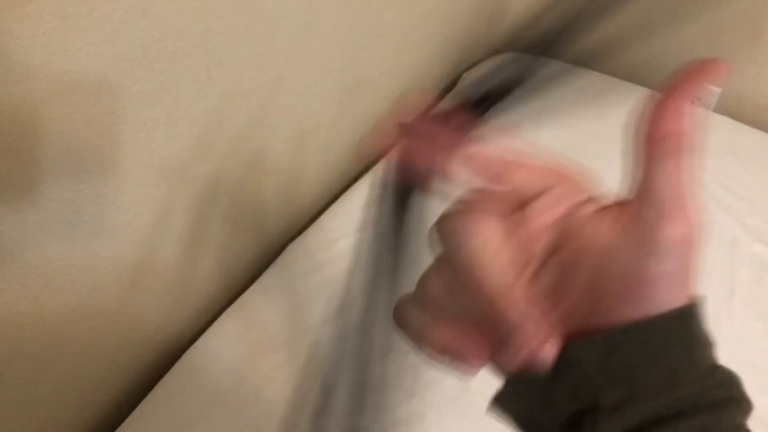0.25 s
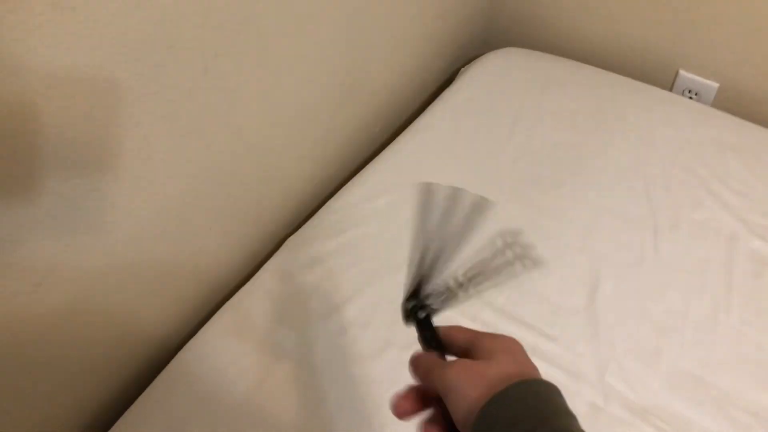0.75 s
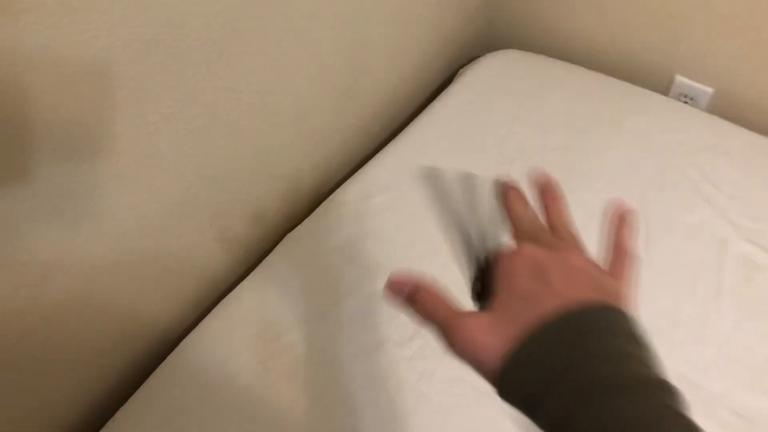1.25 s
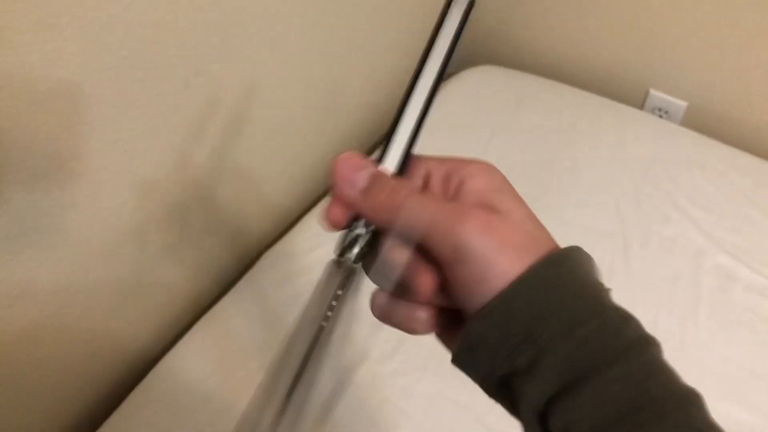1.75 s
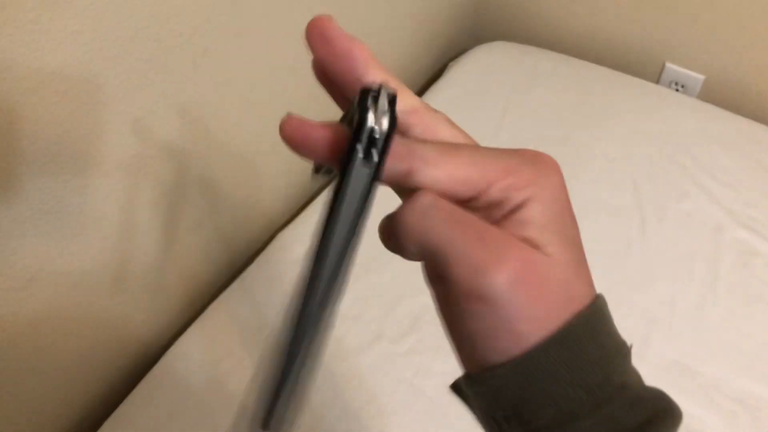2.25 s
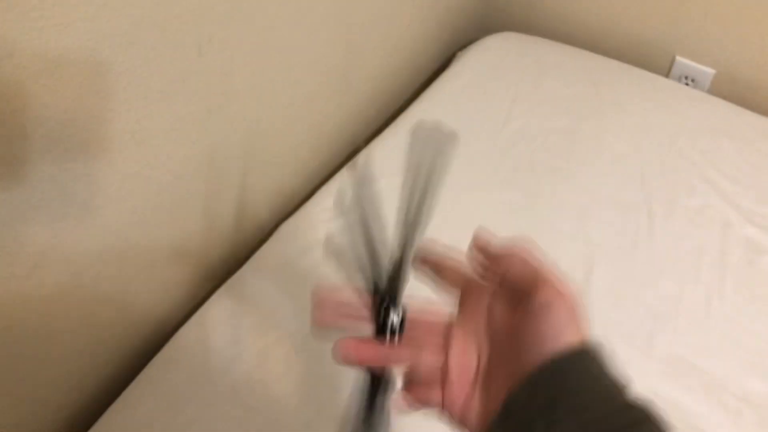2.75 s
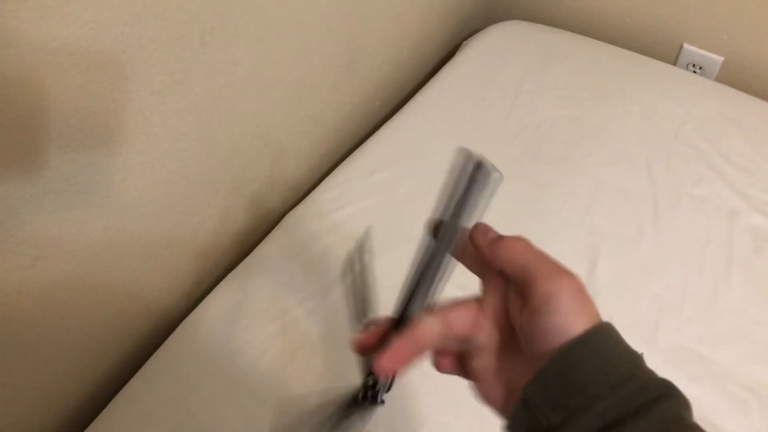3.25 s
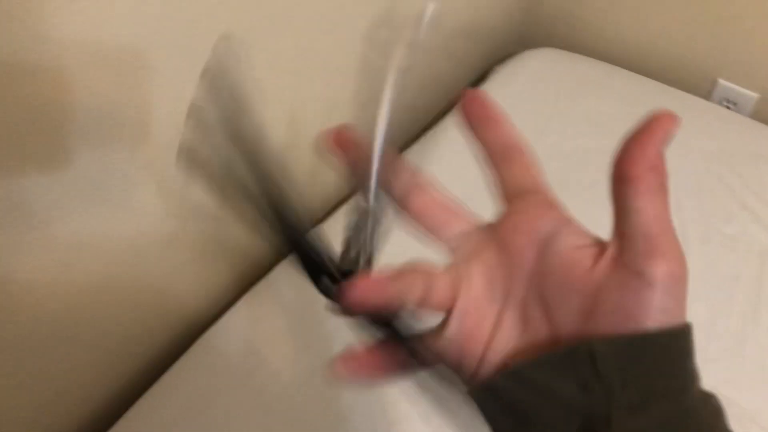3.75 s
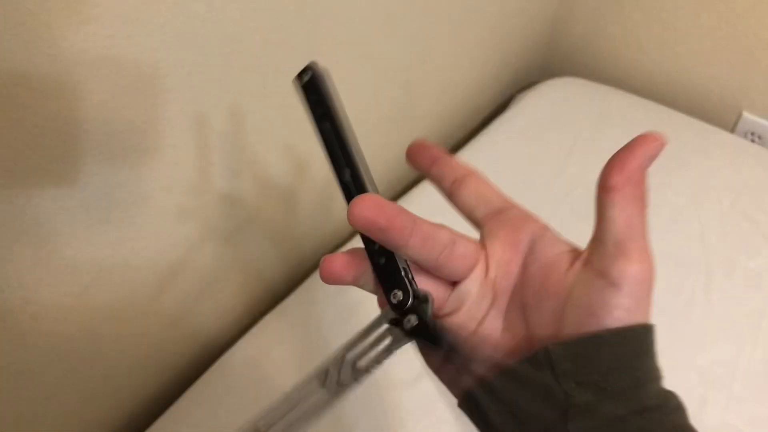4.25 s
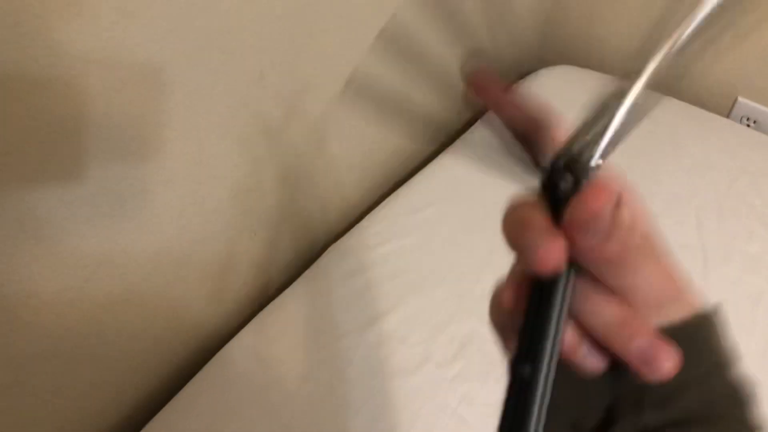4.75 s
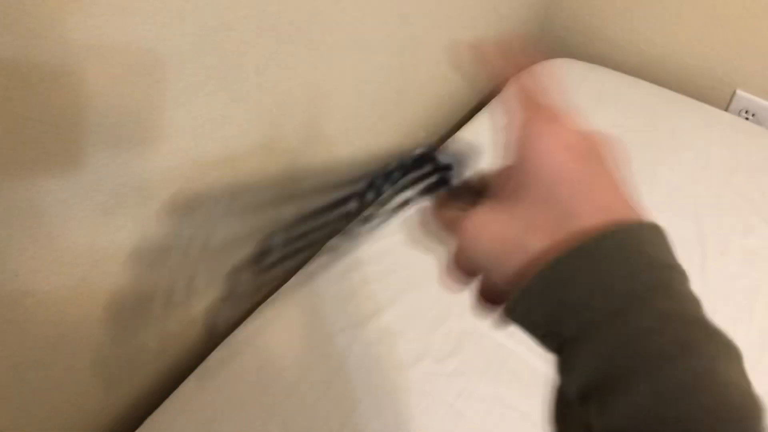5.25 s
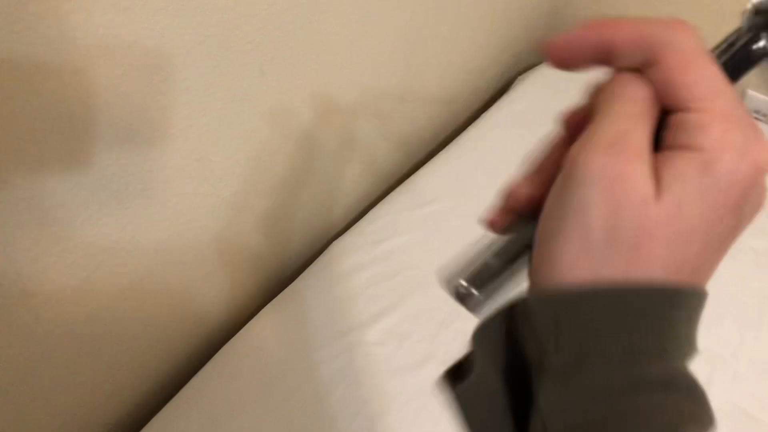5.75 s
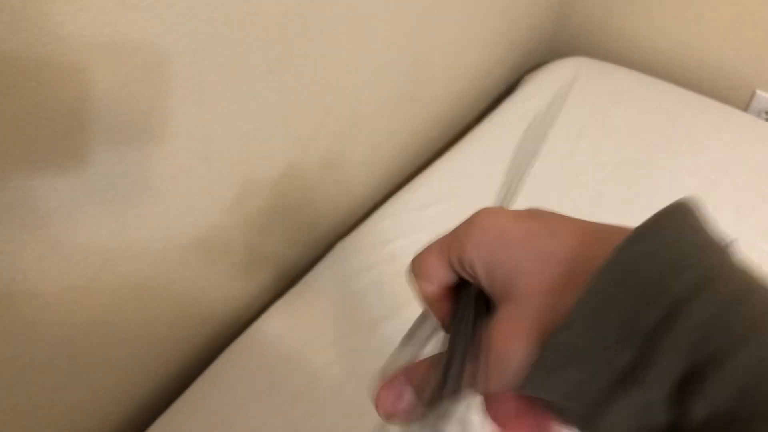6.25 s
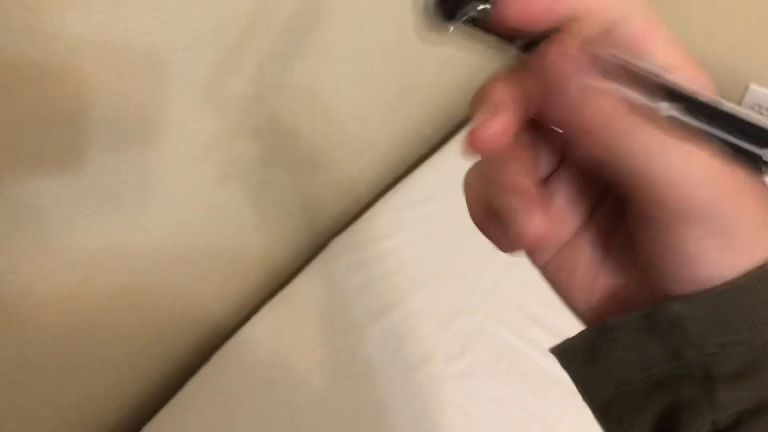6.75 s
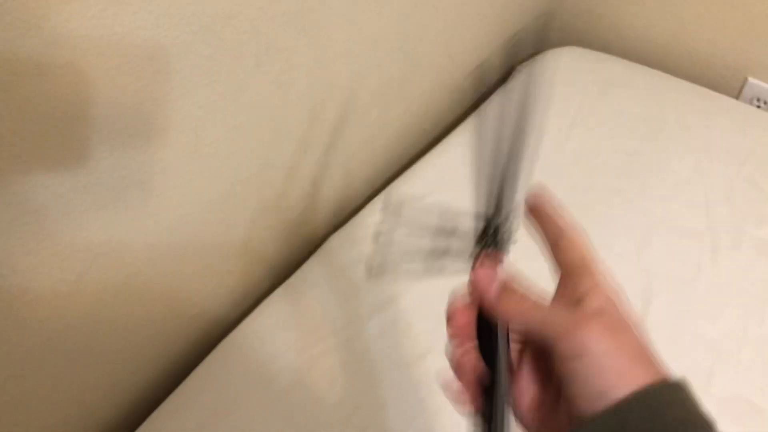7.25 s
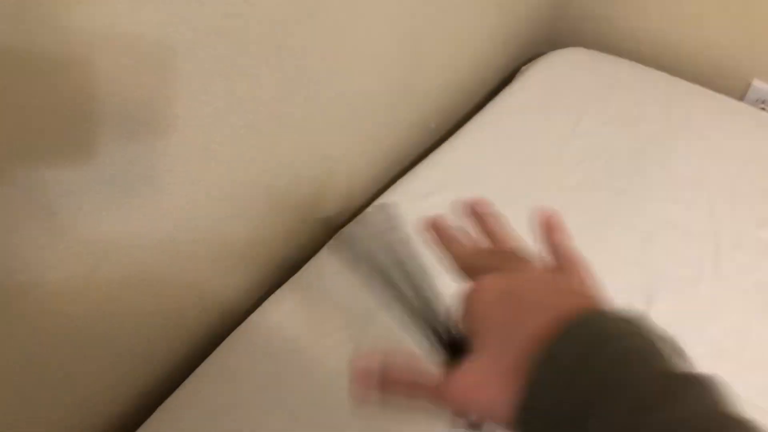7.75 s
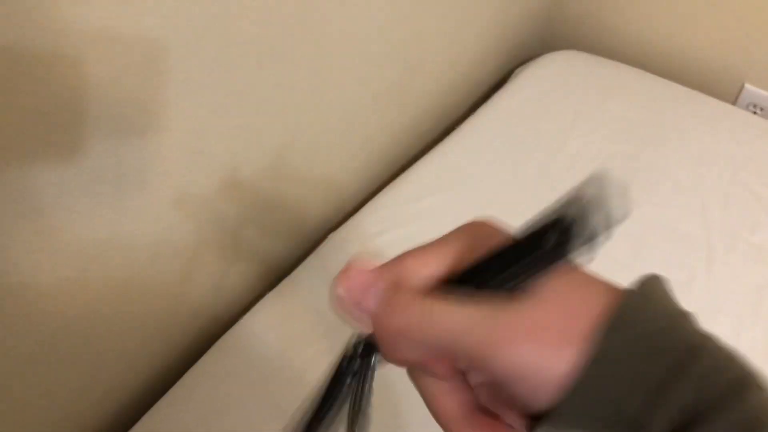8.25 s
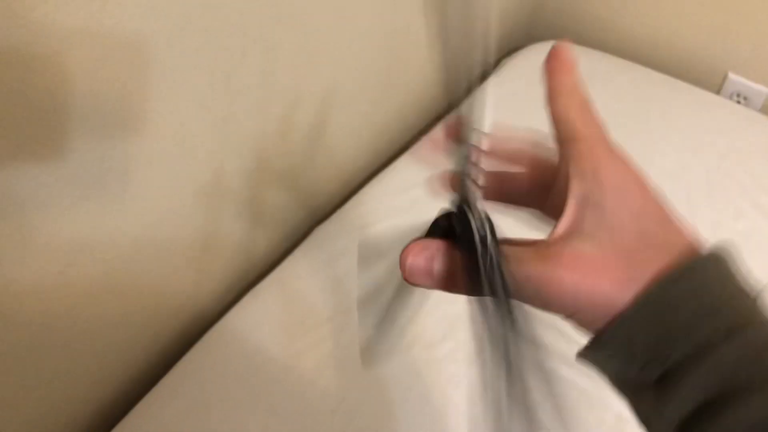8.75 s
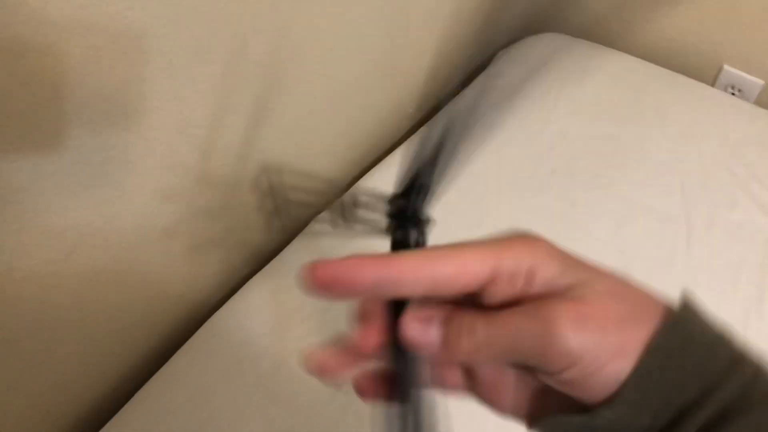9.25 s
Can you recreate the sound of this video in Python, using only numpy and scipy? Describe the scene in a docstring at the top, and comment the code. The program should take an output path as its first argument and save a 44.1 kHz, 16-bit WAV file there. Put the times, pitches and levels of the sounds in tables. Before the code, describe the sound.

Metal handles slap together and against a blade at uneven intervals, starting softly, then hitting hard around two seconds and again between six and seven. Some strikes stutter into several quick rebounds. Between them are delicate clicks, faint rubbing, muffled knocks and two barely audible thin squeaks. The phone is close, the bedroom briefly echoes, and low air noise stays underneath.

```python
"""Butterfly knife flipped in a small bedroom

A butterfly knife is flipped by hand close to a phone. Its handles slap against each other and the blade, chatter
for a few milliseconds and bounce: noisy blows ring metal modes. The loose pivots tick lightly and squeak twice.
Between the clacks, coloured noise makes skin and sleeve rub, the knife bumps dully into the fingers,
and a low swish comes and goes over steady air. The walls echo all but the rubbing, swish and air."""
import sys
import numpy as np
from scipy import signal
from scipy.fft import rfft, irfft, next_fast_len
from scipy.io import wavfile
from scipy.ndimage import map_coordinates

SR = 44100
rng = np.random.default_rng(int(sys.argv[2]) if len(sys.argv) > 2 else 0)


def transcribe(signal):
    """Save signal, clipped to [-1, 1], as a 16-bit WAV file at the path in sys.argv[1]."""
    frames = np.atleast_2d(signal).T
    limited = np.clip(frames, -1, 1)
    pcm = np.round(limited * 32767).astype(np.int16)
    wavfile.write(sys.argv[1], SR, pcm)


N = 419832
HIT_SIZE = 4096  # length of one hit, in samples
STRIKE_SPREAD_DB = 2  # random spread of each mode's level from hit to hit

# Modes of the hand-damped knife, from hollow to bright.
# Each row: frequency in Hz, bandwidth in Hz, level in dB relative to the other modes of its group.
CLACK = [(2176, 260, -7), (2624, 390, -4), (2900, 260, -4.5), (3680, 300, 0.5)]
RING = [(4400, 990, -12.5), (4880, 650, -9.5), (5660, 380, -8.5), (6350, 580, -8), (7182, 240, 3),
        (7730, 260, -4), (8270, 790, -14)]
SHEEN = [(9930, 3300, -13), (11280, 290, -6), (11560, 990, -2.5), (13950, 1300, -2.5), (15110, 580, -1.5)]


def amp(db):
    """Decibels to gain."""
    return 10 ** (np.asarray(db) / 20)


def along(points, hz):
    """Read (Hz, value) points on a log frequency axis."""
    f, v = np.transpose(points)
    return np.interp(np.log(hz + 1), np.log(f + 1), v)


def wobble(rate):
    """A smooth random curve with rate knots a second."""
    knots = rng.standard_normal(int(N * rate / SR) + 4)
    return map_coordinates(knots, [np.arange(N) * rate / SR])


def filtered(x, response):
    """x times a response of frequency."""
    size = next_fast_len(len(x) + HIT_SIZE)
    hz = np.fft.rfftfreq(size, 1 / SR)
    return irfft(rfft(x, size) * response(hz), size)[:len(x)]


def coloured(x, spectrum):
    """x with a (Hz, dB) colour, at rms 1."""
    sound = filtered(x, lambda hz: amp(along(spectrum, hz)))
    return sound / np.std(sound)


def add(track, s, sound):
    """Mix a sound into the track at time s."""
    part = track[max(round(s * SR), 0):][:len(sound)]
    part += sound[:len(part)]


def swells(rows):
    """Summed power of bell-shaped (middle s, peak dB, half length s) swells."""
    t, power = np.arange(N) / SR, np.zeros(N)
    for s, db, half_length in rows:
        near = slice(*np.searchsorted(t, [s - 4 * half_length, s + 4 * half_length]))
        power[near] += amp(db) ** 2 * np.exp(-((t[near] - s) / half_length) ** 2)
    return power


def resonate(force, modes, detune):
    """Ring the modes at fresh strengths, as each blow lands on another spot; energy of rms 1 over 5 ms."""
    chance = rng.standard_normal((len(modes), 2))
    tuned = [(hz * (1 + detune * a), width, amp(db + STRIKE_SPREAD_DB * b))
             for (hz, width, db), (a, b) in zip(modes, chance)]

    def response(f):
        # neighbouring modes alternate in sign
        return sum((-1) ** k * gain * 1j * f * width / (hz * hz - f * f + 1j * f * width)
                   for k, (hz, width, gain) in enumerate(tuned))

    ring = filtered(force, response)
    return ring / np.linalg.norm(ring) * np.sqrt(.005 * SR)


def contact(chatter, grit, grit_t60):
    """Force of one blow: a strike, a noisy buzz of tiny rebounds in the pivot's play, then a dying grating."""
    t = np.arange(HIT_SIZE) / SR
    fall = amp(-60 * np.maximum(t - chatter, 0) / grit_t60)
    force = grit * rng.standard_normal(HIT_SIZE) * fall
    force[0] += 1
    return force


def blows():
    """Slaps and rebounds, the soft ones hollower: the sound towards the phone and that towards the walls."""
    # A swinging handle slaps home; the grip sets pitch and strength of the two bending modes.
    # Each row: start in seconds, ring level in dB, thud in dB re ring, sheen in dB re ring,
    # level towards the walls in dB re direct, low bend in Hz, its dB re clack, high bend in Hz, its dB re clack.
    slap_rows = [(0.2663, -29, -13, -13, -1.5, 1633, -3, 2490, -7.5),
                 (0.6256, -22, -19.5, -16.5, 2.5, 1650, -15.5, 2520, -7),
                 (.897, -21, -27.5, -15, 6, 1670, -13.5, 2450, -1.5),
                 (1.482, -22, -16, -4, 1.5, 1640, -7, 2400, 1),
                 (1.7932, -11.5, -34, -9.5, 3, 1680, -13.5, 2420, -3),
                 (2.266, -10.5, -19, -7.5, 0, 1630, -7, 2630, 1),
                 (2.8208, -15, -27.5, -12, 4, 1640, -12.5, 2540, -14),
                 (3.344, -27.5, -16, -11, 3.5, 1713, -13, 2700, -5),
                 (4.0649, -25.5, -17.5, -3.5, -1, 1740, -10, 2560, 2.5),
                 (4.0787, -23, -17.5, -9, 3, 1665, -8, 2560, -1),
                 (4.961, -27.5, -15.5, -10, 0.5, 1660, -7.5, 2550, 0.5),
                 (5.3234, -41, -9.5, -3, 4, 1500, -6, 2000, -12),
                 (5.5392, -38.5, -6.5, -13, 0, 1700, -1, 2580, 2.5),
                 (5.9286, -25, -13, -8, 0, 1610, -4.5, 2430, -9.5),
                 (6.3017, -13.5, -40, -7, -1.5, 1686, -9, 2555, 2.5),
                 (6.7814, -31.5, -23, -8, 1.5, 1554, -4, 2240, -11.5),
                 (7.0026, -8.5, -41, -15, -1.5, 1530, -11, 2885, -13.5),
                 (7.1534, -20, -33.5, -12.5, 0, 1660, -9, 2280, -14),
                 (7.8599, -34, -28.5, -13, 3.5, 1660, -14.5, 2820, -13),
                 (8.6407, -28, -45, -11, 2, 1540, -3.5, 2885, -9),
                 (9.1109, -24.5, -19, -11.5, 0, 1725, -17, 2200, -5),
                 (9.365, -23, -25, -8.5, 1.5, 1570, -3, 2280, -3),
                 (9.5165, -16, -48, -13.5, -4, 1470, -5.5, 2950, -4)]
    # The handle bounces and lands again, still in the grip of the slap before.
    # Each row: start in seconds, ring level in dB.
    rebound_rows = [(0.91, -29), (1.535, -45), (2.2818, -17.5), (2.3079, -28), (2.3268, -23), (2.338, -31),
                    (2.8376, -17), (2.8496, -33.5), (4.0908, -34), (5.9476, -24.5), (5.958, -28),
                    (5.9672, -34), (5.9786, -34.5), (6.327, -14), (6.3429, -14), (6.3536, -32.5),
                    (7.1957, -38.5), (7.877, -27), (7.891, -26), (7.8998, -30)]
    medium_clack_db, medium_blow_db = -9.5, -25.5  # clack re ring, in a blow of medium strength
    clack_fall = .42  # dB less clack for each dB more strength: hard blows are brighter
    chatter_s, chatter_spread = 0.0023, 0.33  # typical buzz, and its log spread from blow to blow

    direct, outward = np.zeros((2, N))
    starts = [row[0] for row in slap_rows]
    rebounds = [(s, db, *slap_rows[np.searchsorted(starts, s) - 1][2:]) for s, db in rebound_rows]
    for s, db, thud_db, sheen_db, wall_db, *bends in list(slap_rows) + rebounds:
        clack_db = medium_clack_db - clack_fall * (db - medium_blow_db)
        colour = thud_db, clack_db, sheen_db, bends
        chatter = chatter_s * np.exp(chatter_spread * rng.standard_normal())
        force = contact(chatter, grit=0.57, grit_t60=0.016)
        add(direct, s, amp(db) * slap(force, *colour))
        # summed over all directions, the ripples of the chatter even out
        smooth_force = contact(chatter, grit=.04, grit_t60=.016)
        add(outward, s, amp(db + wall_db) * slap(smooth_force, *colour))
    return direct, outward


def slap(force, thud_db, clack_db, sheen_db, bends):
    """A bright ring near 7 kHz and a metallic sheen over a hollow clack."""
    ring = resonate(force, RING, detune=0.015)
    sheen = amp(sheen_db) * resonate(force, SHEEN, detune=0.017)
    return ring + sheen + knock(force, thud_db, clack_db, bends)


def knock(force, thud_db, clack_db, bends):
    """The handles' bending modes, shifted by the grip, and just after them the dull push into the hand."""
    # The hand that takes the blow. Each row: frequency in Hz, bandwidth in Hz, relative level in dB.
    hand_modes = [(170, 170, -6.5), (390, 200, -1), (720, 210, -8.5)]
    low_hz, low_db, high_hz, high_db = bends
    bend = amp(low_db) * resonate(force, [(low_hz, 110, 0)], detune=0.0066)
    bend += amp(high_db) * resonate(force, [(high_hz, 170, 0)], detune=0.0089)
    overtones = resonate(force, CLACK, detune=.025)
    clack = amp(clack_db) * (bend + amp(-2.0) * overtones)
    push = contact(0.00086, grit=0.079, grit_t60=0.01)
    add(clack, .001, amp(thud_db) * resonate(push, hand_modes, detune=0.063))
    return clack


def ticks():
    """Light, crisp touches in the pivots: thinner, with less ring."""
    # Light ticks of the pivots. Each row: start in seconds, level in dB.
    tick_rows = [(.4395, -58.5), (.4567, -59), (.5142, -59), (.5512, -52.5), (.5751, -54.5), (2.1252, -51),
                 (3.5898, -53), (3.6155, -53.5), (3.6491, -57), (3.8813, -51), (4.3932, -55), (5.1189, -46),
                 (5.1431, -51.5), (5.447, -61.5), (5.4745, -56), (5.493, -61), (5.5118, -55), (6.183, -60),
                 (6.2129, -60.5), (6.7086, -53), (7.3282, -49), (8.2618, -50.5), (8.3014, -46.5),
                 (8.3123, -50.5), (8.34, -58), (8.428, -59), (8.833, -58), (8.8813, -54), (8.93, -62)]
    # Bending modes in a loose grip: low bend in Hz, its dB re clack, high bend in Hz, its dB re clack.
    loose_bends = (1609.5, -5, 2221.5, -11.5)
    thud_db, clack_db = -11.5, -2.5  # re the tick
    track = np.zeros(N)
    for s, db in tick_rows:
        force = contact(.001, grit=.12, grit_t60=.018)
        tick = amp(-1) * resonate(force, RING, detune=.02)
        tick += amp(-3.5) * resonate(force, SHEEN, detune=0.057)
        add(track, s, amp(db) * (tick + knock(force, thud_db, clack_db, loose_bends)))
    return track


def squeaks():
    """A dry pivot sticks and slips as it turns, heard as a thin, wavering whistle."""
    # Squeaks of the pivot. Each row: middle in seconds, peak level in dB, mean pitch in Hz,
    # half length in seconds.
    squeak_rows = [(4.792, -68, 5760, 0.019), (5.798, -61.5, 6500, 0.014)]
    track = np.zeros(N)
    t = np.arange(-HIT_SIZE, HIT_SIZE) / SR
    for s, db, hz, half_length in squeak_rows:
        waver = 1 + 0.0056 * wobble(203)[:len(t)]
        tone = np.sqrt(2) * np.sin(2 * np.pi * np.cumsum(hz * waver) / SR)
        swell = np.exp(-(t / half_length) ** 2 / 2)
        add(track, s + t[0], amp(db) * swell * tone)
    return track


def bumps():
    """Flesh damps a contact to one dull, broad knock."""
    # Soft bumps of knife and hand. Each row: start in seconds, level in dB, pitch in Hz before a slight detune.
    bump_rows = [(.974, -49.5, 750), (2.607, -54.5, 760), (3.615, -50, 630), (4.672, -54.5, 657),
                 (5.12, -43, 295), (5.377, -49.5, 107.6), (5.409, -58, 80), (5.486, -48.5, 128),
                 (7.344, -56, 120), (7.483, -53.5, 716), (7.784, -57, 119.3)]
    track = np.zeros(N)
    for s, db, hz in bump_rows:
        force = contact(0.0015, grit=0.123, grit_t60=0.023)
        push = filtered(force, lambda f: 1 / (1 + 1j * f / (2 * hz)))  # gentle low-pass
        add(track, s, amp(db) * resonate(push, [(hz, hz, 0)], detune=0.017))
    return track


def rubbing():
    """Skin and sleeve slide over the metal in strokes of clumped grains, with noise stirring the knife's modes."""
    # Strokes along the handles, ahead of the mix of grains and metal.
    # Each row: middle in seconds, peak level in dB, half length in seconds.
    stroke_rows = [(.58, -56.5, 0.029), (.76, -63, 0.042), (1.25, -69.5, 0.085), (1.425, -53, 0.021),
                   (2.14, -61, 0.036), (3.62, -66, 0.028), (4.395, -58.5, .014), (4.861, -59, .008),
                   (5.13, -66.5, 0.11), (5.36, -60.5, 0.046), (5.49, -59.5, .04), (5.65, -59, .045),
                   (5.765, -60, 0.05), (6.50, -56, 0.054), (6.75, -62.5, 0.051), (7.39, -62.5, 0.032),
                   (7.62, -66.5, 0.023), (7.97, -55.5, 0.019), (8.10, -57, 0.043), (8.36, -60, 0.047),
                   (8.59, -62.5, .015), (8.86, -70, 0.042), (9.25, -66.5, 0.033)]
    # Colour of the grains. Each row: frequency in Hz, relative level in dB per Hz.
    grain_colour = [(350, -40), (600, -10), (1280, -9.5), (1590, -4), (3430, -10.5), (3730, -4.5),
                    (6640, -0.5), (7620, -5), (15100, -5.5), (16000, -10.5)]
    # faint rubbing of the restless fingers: middle level and wander in dB, shifts per second
    grip_db, grip_wander_db, grip_shifts = -76.5, 2, 3.4
    grip = amp(grip_db + grip_wander_db * wobble(grip_shifts))
    power = grip ** 2 + swells(stroke_rows)
    grains = rng.standard_normal(N) * amp(3.2 * wobble(900) + 2.0 * wobble(84))
    catches = rng.standard_normal(N) * amp(7 * wobble(150))
    metal = resonate(catches, CLACK + RING, detune=.005)
    texture = amp(1.0) * coloured(grains, grain_colour) + amp(-7.5) * metal / np.std(metal)
    return np.sqrt(power) * texture


def low_swish():
    """Low coloured noise that comes and goes in bell-shaped swells."""
    # Low swishes. Each row: middle in seconds, peak level in dB, half length in seconds.
    swish_rows = [(.38, -63.5, 0.18), (.75, -64.5, .12), (1.27, -56.5, 0.067), (2.6, -63, 0.16),
                  (4.75, -64.5, 0.33), (5.25, -64.5, 0.1), (6.55, -66, .25), (7.35, -61, .1),
                  (8.62, -64, .25), (9.48, -71, 0.14)]
    # Colour of the swish. Each row: frequency in Hz, relative level in dB per Hz.
    swish_colour = [(120, -34.5), (220, -10), (310, 2), (420, -9.5), (700, -18.5), (1500, -37)]
    return np.sqrt(swells(swish_rows)) * coloured(rng.standard_normal(N), swish_colour)


def room_air():
    """Steady room air: noise weighted towards the bass, at -65.5 dB."""
    # Colour of the air. Each row: frequency in Hz, relative level in dB per Hz.
    air_colour = [(25, -24), (40, -12), (55, -2), (90, -4.5), (160, -6.5), (300, -10), (500, -17.5),
                  (1000, -23), (2500, -29), (5000, -32.5), (9000, -33), (16000, -36)]
    return amp(-65.5) * coloured(rng.standard_normal(N), air_colour)


def bedroom(x, first_wall, build_up):
    """The walls answer after a short gap (times in s); each frequency dies at its own speed."""
    # Decay of the room. Each row: frequency in Hz, time to fall by 60 dB in seconds.
    decay_times = [(150, .35), (600, 0.47), (1600, 0.33), (4000, 0.36), (7200, 0.36), (11000, 0.29),
                   (16000, .3)]
    # Strength of the echo ahead of its build-up. Each row: frequency in Hz, level in dB re the sound sent in.
    echo_levels = [(150, -10), (700, -10.5), (1600, -7.5), (4000, -11.5), (7200, -14.5), (11000, -15),
                   (16000, -17.5)]
    hz, t, z = signal.stft(rng.standard_normal(SR * 2 // 3), SR, nperseg=256)
    t60 = along(decay_times, hz)[:, None]
    energy = t60 * SR / (2 * np.log(1000))  # of a unit tail, so that T60 leaves the level alone
    fall_db = along(echo_levels, hz)[:, None] - 60 * t / t60
    tail = signal.istft(z * amp(fall_db) / np.sqrt(energy), SR, nperseg=256)[1]
    onset = np.clip((np.arange(len(tail)) / SR - first_wall) / build_up, 0, 1)
    return signal.fftconvolve(x, tail * onset)[:N]


def scene():
    """The knife, its echo and the quiet around it."""
    direct, outward = blows()
    touches = ticks() + bumps() + squeaks()
    echo = bedroom(outward + touches, first_wall=0.001, build_up=0.0085)
    return (direct + touches + echo + rubbing() + low_swish() + room_air())[None]


def record(dry):
    """The phone rounds off the highest peaks, drops the deepest bass and rolls off at its band limit."""
    # Treble roll-off of the microphone. Each row: frequency in Hz, gain in dB.
    roll_off = [(15000, -1), (15700, -4), (16100, -16)]
    top_hz, edge_hz = 16500, 600  # silent above the top; the edge is the width of the fade below it
    rounded = dry / (1 + np.abs(dry / .95) ** 10) ** (1 / 10)

    def response(hz):
        bass_cut = (1j * hz / (1j * hz + 28)) ** 2
        band_limit = np.clip((top_hz - hz) / edge_hz, 0, 1)
        return bass_cut * amp(along(roll_off, hz)) * band_limit

    return np.array([filtered(channel, response) for channel in rounded])


dry = scene()
out = record(dry)
transcribe(out)
```